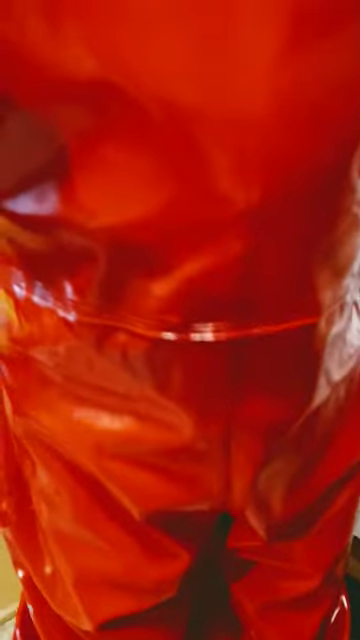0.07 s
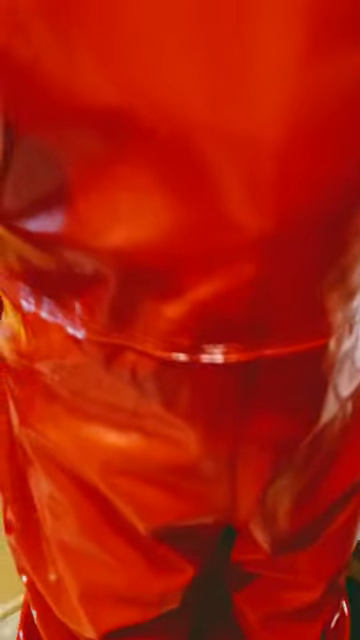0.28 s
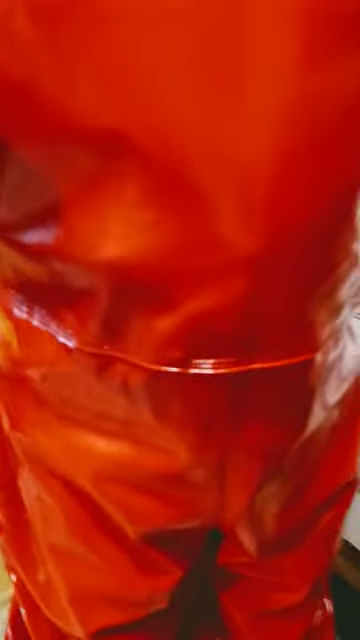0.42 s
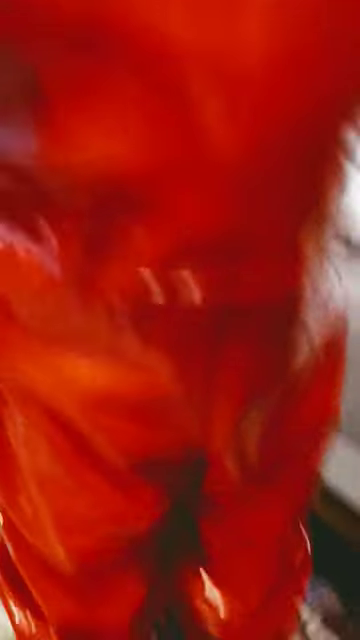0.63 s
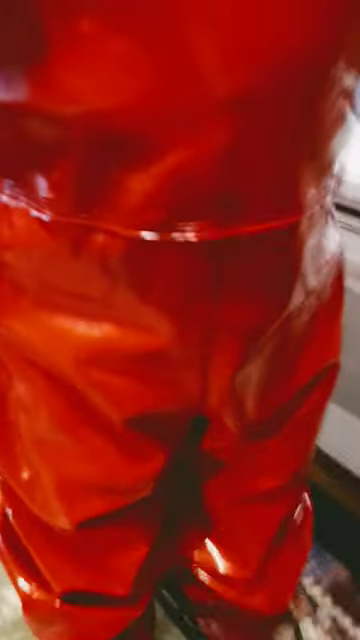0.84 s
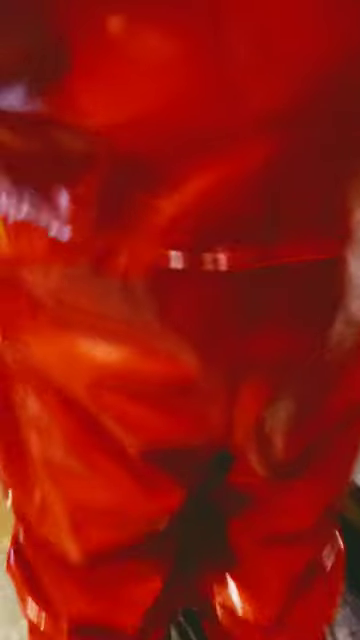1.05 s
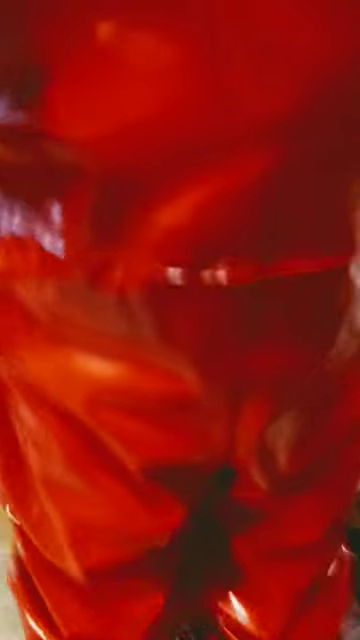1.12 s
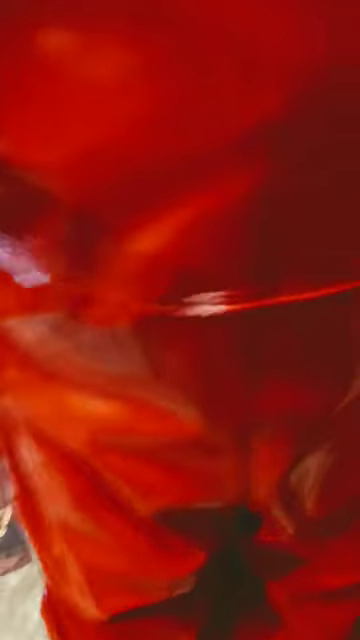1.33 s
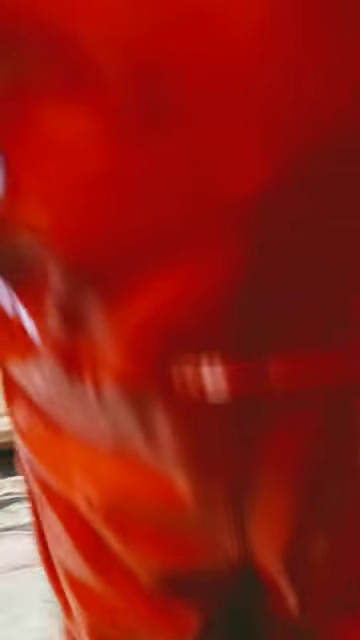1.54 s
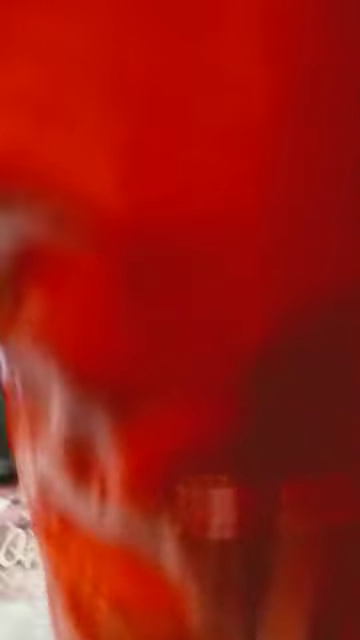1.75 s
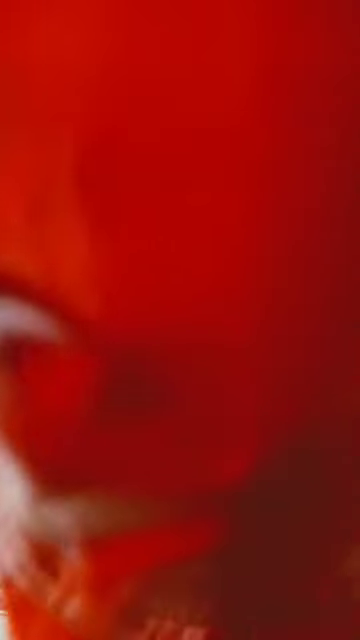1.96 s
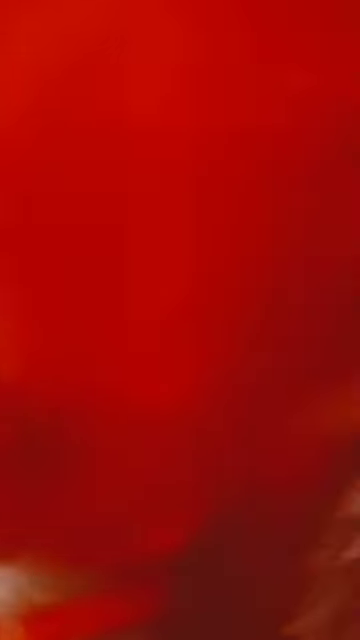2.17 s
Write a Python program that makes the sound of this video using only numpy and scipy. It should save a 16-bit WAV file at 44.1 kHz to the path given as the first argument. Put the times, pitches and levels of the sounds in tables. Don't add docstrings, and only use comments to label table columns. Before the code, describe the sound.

Shiny plastic-like fabric creaks and crackles as a wearer moves, snapping hard then rubbing in brief hisses

```python
import sys
import numpy as np
from scipy import signal
from scipy.fft import rfft, irfft
from scipy.io import wavfile
from scipy.ndimage import uniform_filter1d, map_coordinates

SR = 44100
rng = np.random.default_rng(int(sys.argv[2]) if len(sys.argv) > 2 else 0)


def invert_db(level):
    return 10 ** (np.asarray(level, dtype=float) / 20)


def dump_mix(stems):
    frames = np.atleast_2d(stems).T
    limited = np.clip(frames, -1, 1)
    pcm = np.round(limited * 32767).astype(np.int16)
    wavfile.write(sys.argv[1], SR, pcm)


N = 97020


def unit(x):
    return x / np.sqrt(np.mean(x ** 2) + 1e-20)


def wobble(rate_hz):
    knots = rng.standard_normal(int(N * rate_hz / SR) + 4)
    return map_coordinates(knots, [np.arange(N) * rate_hz / SR])


def coloured(x, points, lag_s=0):
    size = 2 ** 17
    hz = np.fft.rfftfreq(size, 1 / SR)
    f, db = np.transpose(points)
    curve_db = np.interp(np.log(hz + 1), np.log(f), db)
    cepstrum = irfft(np.log(invert_db(curve_db)), size)
    cepstrum[1:size // 2] *= 2
    cepstrum[size // 2 + 1:] = 0
    response = np.exp(rfft(cepstrum) - 2j * np.pi * hz * lag_s)
    return irfft(rfft(x, size) * response, size)[:N]


def add(track, s, sound):
    part = track[..., round(s * SR):][..., :sound.shape[-1]]
    part += sound[..., :part.shape[-1]]


def panned(db, left_over_right_db):
    return invert_db(db + np.minimum(0, [[left_over_right_db], [-left_over_right_db]]))


def wavelet(hz, cycles, t, sag=1):
    u = t * hz / cycles
    return -np.e * u * np.exp(-u) * np.cos(2 * np.pi * (hz * t) ** sag)


# f/Hz, level/dB
ROOM_TONE = [(25, -3), (175, 8.5), (490, -6.5), (1560, -12.5), (3000, -14.5), (4000, -25.5), (9000, -25),
             (13500, -28.5)]
# f/Hz, level/dB
STEADY_TOP = [(13500, 0), (14300, -40)]


def room():
    sides = []
    for db in [-65.5, -76]:
        tone = unit(coloured(rng.standard_normal(N), ROOM_TONE))
        sides.append(invert_db(db) * coloured(tone, STEADY_TOP))
    return np.array(sides)


# t/s, peak level/dB, f/Hz, left over right/dB
FOLDS = [
    (.008, -47.5, 219, -15),
    (0.2145, -9.5, 259, 44),
    (0.4023, -30, 330, 16),
    (0.494, -31, 370, 30),
    (0.773, -25, 180, 13),
    (0.967, -38, 135, 41),
    (1.053, -43, 142.4, 46),
    (1.3264, -33, 440, -34),
    (1.616, -23, 129.4, 18),
    (2.0455, -30.5, 660, 24),
]


def fold_thuds():
    out, t = np.zeros((2, N)), np.arange(SR // 10) / SR
    for s, db, hz, pan_db in FOLDS:
        add(out, s, panned(db, pan_db) * wavelet(hz, cycles=0.43, t=t, sag=0.85))
    return out


def patchy(x):
    z = signal.stft(x, nperseg=256)[2]
    field = uniform_filter1d(rng.standard_normal(z.shape), size=5, axis=0)
    field = uniform_filter1d(field, size=9, axis=1)
    gain_db = 2.5 * unit(field)
    return signal.istft(z * invert_db(gain_db), nperseg=256)[1][:N]


CRINKLE_HZ, CRINKLE_OCTAVES = [1152.6, 650], [0.555, 1.09]


def crinkles(side, count):
    cycles, spread_db = 3.4, 3.5
    when, pitch, size = rng.random((count, 3)).T
    octaves = CRINKLE_OCTAVES[side] * np.log(pitch / (1 - pitch)) / 2
    hz = np.clip(CRINKLE_HZ[side] * 2 ** octaves, 200, 6000)
    k = np.arange(700)
    level = invert_db(-spread_db * np.log(size))
    grains = level[:, None] * wavelet(hz[:, None], cycles, k / SR)
    places = (when * N).astype(int)[:, None] + k
    return unit(np.bincount(places.ravel(), grains.ravel())[:N])


# start t/s, length/s, place of the peak/0-1, hiss level/dB, rumble level/dB
STROKES_LEFT = [(.209, 0.044, 0.18, -35, -32), (.215, 0.076, 0, -49, -45.5), (.37, 0.11, 0.41, -94, -60),
                (.86, 0.56, 0, -101, -67.5), (.3, .06, 0.52, -60, -56.5), (.49, 0.51, 0.01, -68, -62.5),
                (.58, 0.072, 0.72, -54.5, -56.5), (.69, 0.13, 0.57, -49, -43.5),
                (.72, 0.024, 0.36, -52, -53), (.736, 0.014, 0.64, -62, -44), (.754, 0.02, .35, -46.5, -54),
                (.771, .02, 0.35, -49, -50), (.845, 0.03, 0.18, -46.5, -48), (.81, 0.1, 0.37, -57.5, -48),
                (.925, 0.032, 0.7, -86, -60), (.955, 0.051, 0.2, -68, -64),
                (1.01, 0.082, 0.18, -63.5, -60.5), (1.17, 0.13, 0.43, -61.5, -58),
                (1.575, 0.051, .5, -63, -49), (1.79, 0.14, 0.39, -56, -50), (1.858, 0.0077, 0.22, -52, -43),
                (1.915, 0.14, 0.11, -41.5, -42.5), (1.96, 0.11, 0.74, -56.5, -51),
                (2.04, 0.33, 0, -99, -56), (2.153, .2, 0.06, -44, -45)]
STROKES_RIGHT = [(.47, 0.048, 0.33, -88, -48), (.42, 0.76, 0.21, -78, -90), (.63, 0.06, 0.89, -63, -61.5),
                 (1.27, 0.047, 0.54, -49, -53.5), (1.32, 0.036, 0.31, -46, -49),
                 (1.355, 0.035, 0.59, -32, -38), (1.375, 0.18, 0.41, -31.5, -43),
                 (1.435, 0.069, 0.41, -34, -78), (1.515, 0.084, 0.31, -34, -46),
                 (1.612, 0.06, 0.014, -28.5, -40.5), (1.63, 0.13, 0.62, -30.5, -41.5),
                 (1.74, 0.043, 0.22, -50.5, -48.5), (1.775, 0.073, 0.16, -39.5, -47.5),
                 (1.82, 0.074, 0.4, -45, -47), (1.87, 0.3, 0.099, -57.5, -58.5),
                 (2.115, 0.054, 0.84, -52.5, -52.5)]
# f/Hz, level/dB
HISS_LEFT = [(900, -12), (2400, 6), (3600, 3.5), (5000, 7), (8000, 3), (11000, -9), (13500, -50),
             (16000, -33)]
HISS_RIGHT = [(900, -22), (2000, -24), (5500, -23.5), (7400, -16.5), (8400, -18), (9900, -14.5),
              (11500, -22), (13800, -15)]
# f/Hz, level/dB
RUMBLE_LEFT = [(30, -46.5), (110, 13.5), (250, 6.5), (600, 5), (1000, 1.5), (1800, 2), (4000, -11.5)]
RUMBLE_RIGHT = [(30, -16.5), (100, -4.5), (230, 0.5), (600, -8), (1200, -10.5), (2200, -24.5), (4000, -54)]
STROKE_BITE, CRINKLE_DB = [1.7, 1.4], [-3.5, -4.5]


def rubbing(strokes, hiss, rumble, lumpy_db, side):
    t = np.arange(N) / SR
    shapes = []
    for s, length, peak, _, _ in strokes:
        knots = [s, s + length * np.clip(peak, .01, .99), s + length]
        swell = np.sin(np.interp(t, knots, [0, np.pi / 2, np.pi]))
        shapes.append(np.abs(swell ** STROKE_BITE[side]))
    high, low = invert_db(np.array(strokes)[:, 3:].T) @ np.array(shapes)
    grit_db = 3.2 * wobble(700) + 1.6 * wobble(59.43)
    lumps_db = lumpy_db * wobble(250) + 0.98 * wobble(38.82)

    patches = []
    for grit_noise, lump_noise in rng.standard_normal((2, 2, N)):
        grit = patchy(grit_noise * invert_db(grit_db))
        lumps = patchy(lump_noise * invert_db(lumps_db))
        hissing = high * unit(coloured(grit, hiss))
        rumbling = coloured(low * lumps, rumble) / np.std(coloured(lumps, rumble))
        crinkling = invert_db(CRINKLE_DB[side]) * low * crinkles(side, count=2000)
        patches.append(coloured(hissing + rumbling + crinkling, STEADY_TOP))
    near, other = patches
    alike = 0.06
    return near, alike * near + np.sqrt(1 - alike ** 2) * other


# t/s, peak level/dB, f/Hz, crack over the wavelet/dB, reach to the far side/dB
CREASES_LEFT = [(.2143, -9.5, 2200, -5, 6), (.2178, -4, 4080, -14, 10), (.4188, -11.5, 2850, -2, -19),
                (.4238, -7, 6600, -8, -23), (.6753, -17.5, 2410, -49, -34), (.7245, -27.5, 2480, -22, 9),
                (.745, -24.5, 1980, -23, 9), (.759, -21, 2460, -22, -5), (.7738, -24.5, 2680, -22, 15),
                (.8532, -27, 954, 11.5, -25), (.934, -47, 655, -22, 6), (.9675, -46, 2220, -7, 11),
                (1.0225, -43.5, 596, -18, 7.5), (1.4415, -32, 1506, -7, -6), (1.527, -24.5, 3000, -4, -7),
                (1.785, -29, 4200, 8.5, 11), (1.9305, -6.5, 2880, -23, -42)]
CREASES_RIGHT = [(.4226, -13, 2430, 12.5, -7.5), (.4697, -12.5, 3810, 6.5, 4.5),
                 (.4822, -31.5, 7300, 8, 14.5), (.4829, -25, 680, -15, -39), (.8082, -12, 3770, -2, 5),
                 (.8524, -43.5, 6000, 29.5, 11), (1.248, -15.5, 3800, -3.5, 0),
                 (1.2718, -43.5, 4830, 19, -3), (1.6138, -35, 6350, 20, 13.5),
                 (1.7845, -26.5, 6600, 1.5, 0.5), (1.3685, -41.5, 940, 24, -9)]
PORT_DB, TWANG_HZ, TWANG_DB = [-11, -12], [10190, 9850], [-14.5, -9.5]


def port_ring(t, side):
    port_hz, t60_s, rise_s = 8050, 0.013, 0.0016
    decay = invert_db(PORT_DB[side] - 60 * t / t60_s)
    return np.sin(2 * np.pi * port_hz * t) * decay * (1 - np.exp(-(t / rise_s) ** 2))


def crease_snaps(creases, side):
    crack_s, rebound_s, shadow_s = 0.0014, 0.002044, 0.00031
    ring_across_db = -13.5
    near, far = np.zeros(N), np.zeros(N)
    t = np.arange(SR // 40) / SR
    ring = port_ring(t, side)
    twang = invert_db(TWANG_DB[side]) * wavelet(TWANG_HZ[side], 2.5, t)
    rebound = invert_db(-15) * wavelet(696, 0.3, np.maximum(t - rebound_s, 0))
    through_cloth = invert_db(-15.5) * 4 * wavelet(1740, 0.28, np.maximum(t - shadow_s, 0))
    for s, db, hz, crack_db, reach_db in creases:
        noise = np.diff(rng.standard_normal(len(t)), prepend=0)
        crack = 0.28 * noise * np.exp(-(t / crack_s) ** 2) + twang
        push = invert_db(-17.5) * wavelet(hz * 0.182, 0.48, t)
        pop = wavelet(hz, 0.54, t) + invert_db(crack_db) * crack + push
        add(near, s, invert_db(db) * (pop + invert_db(crack_db) * ring))
        ring_across = invert_db(crack_db + ring_across_db) * ring
        add(far, s, invert_db(db + reach_db) * (pop + rebound + through_cloth + ring_across))
    return near, far


# t/s, peak level/dB, f/Hz, life/cycles, left over right/dB
PANELS = [(.222, -19.5, 118.3, 1.04, 30), (.2215, -27, 443, 1.8, 23), (.229, -21.5, 420, 1.16, 12),
          (0.439, -45.5, 130.7, 1.3, 14), (.487, -32, 111, 0.73, 26), (.724, -36, 986, 1.8, 17),
          (.737, -30.5, 234, 0.73, 10), (.741, -34, 1040, 1.75, 19), (.757, -30.5, 284, 0.89, 13),
          (.759, -27, 915, 2.6, 23), (.856, -51, 147, 2.4, 23), (.882, -43, 175, 0.95, 33),
          (.93, -52, 140, 2, 12.5), (1.359, -34.5, 257, 0.93, -19.5), (1.369, -31, 299, 0.63, -12),
          (1.372, -41, 97.5, 2, 13), (1.41, -33, 188, 0.33, 17), (1.418, -36.5, 340, 1.1, -16),
          (1.426, -41, 224, 1.5, 19), (1.44, -31, 510, 0.51, 15), (1.446, -39, 109, 0.78, 26),
          (1.449, -39, 583, 3, -7), (1.46, -39.5, 333, 1.1, 10), (1.481, -43, 310, 1, -22),
          (1.553, -38.5, 283, 1.5, -14), (1.554, -38.5, 496, 0.85, 3), (1.593, -43, 130, .8, 7),
          (1.634, -30, 568, 0.91, 10), (1.637, -49, 197, 1.4, -10), (1.682, -37.5, 203, 0.88, -4),
          (1.694, -42, 173, 1.66, -3.5), (1.708, -46, 260, .8, -6), (1.794, -46, 138.3, 0.87, 9),
          (1.817, -44, 269, 0.59, 3), (1.838, -47, 248, 1.4, -9), (1.856, -42, 270, 0.55, 10),
          (1.965, -40, 144, 0.57, 23), (1.99, -40, 1050, 3.1, 15), (2.02, -45, 152, 1.1, 24),
          (2.163, -40.5, 1100, 4.8, 19)]


def panel_buckles():
    out, t = np.zeros((2, N)), np.arange(SR // 10) / SR
    for s, db, hz, cycles, pan_db in PANELS:
        add(out, s, panned(db, pan_db) * wavelet(hz, cycles, t))
    return out


# f/Hz, level/dB
TO_RIGHT = [(60, -44), (400, -2.5), (1000, -19.5), (2500, -42.5), (4000, -35), (5500, -54), (9500, -20),
            (14000, -56.5)]
TO_LEFT = [(60, -4.5), (130, 0.5), (300, -9.5), (1000, 3), (1800, -0.5), (4000, -6.5), (6500, -11),
           (12000, -35)]


def scene():
    rub_l, rustle_l = rubbing(STROKES_LEFT, HISS_LEFT, RUMBLE_LEFT, lumpy_db=2.5, side=0)
    rub_r, rustle_r = rubbing(STROKES_RIGHT, HISS_RIGHT, RUMBLE_RIGHT, lumpy_db=1.5, side=1)
    snap_l, far_l = crease_snaps(CREASES_LEFT, side=0)
    snap_r, far_r = crease_snaps(CREASES_RIGHT, side=1)
    left = rub_l + snap_l + coloured(rustle_r + far_r, TO_LEFT, lag_s=0.00121)
    right = rub_r + snap_r + coloured(rustle_l + far_l, TO_RIGHT, lag_s=0.000055)
    return np.array([left, right]) + room() + fold_thuds() + panel_buckles()


def roll_off(x):
    return signal.sosfilt(signal.butter(12, 16520, fs=SR, output="sos"), x)


# f/Hz, level/dB
MIC = [(15, -29.5), (45, -12), (90, -3.5), (11000, 0.5), (13500, -12), (15000, -29), (16600, -43),
       (22000, -81.5)]


def record(dry):
    ceiling, knee = 0.52, 4
    squeezed = dry / (1 + np.abs(dry / ceiling) ** knee) ** (1 / knee)
    mix = np.array([coloured(side, MIC) for side in squeezed])
    return roll_off(mix)


dry = scene()
out = record(dry)
dump_mix(out)
```